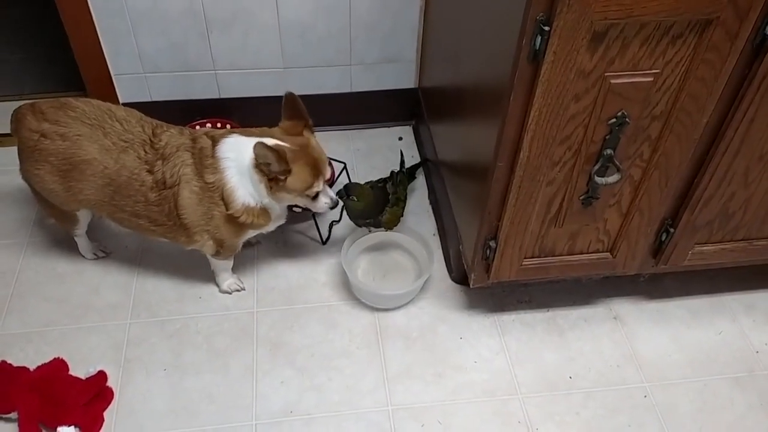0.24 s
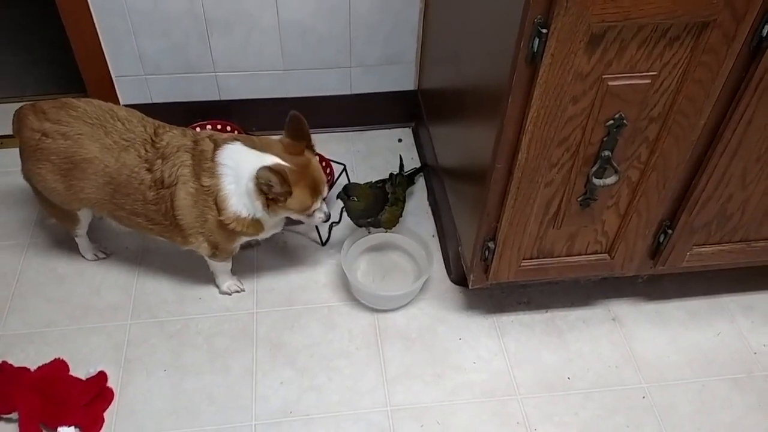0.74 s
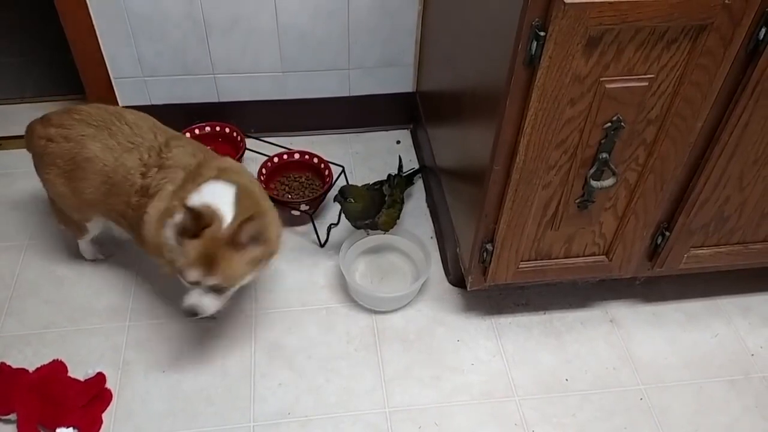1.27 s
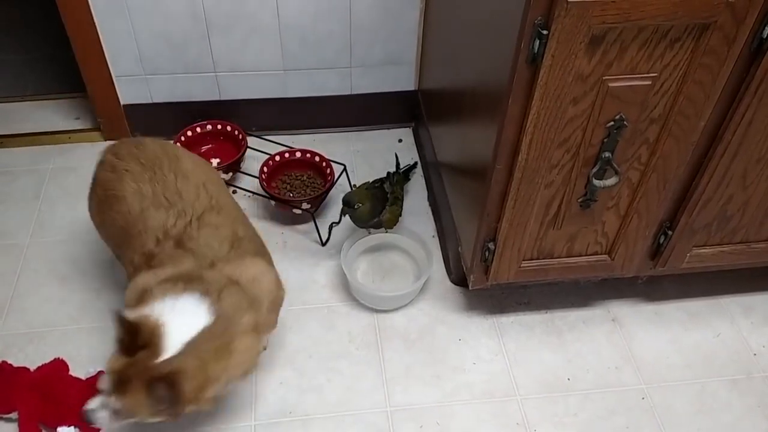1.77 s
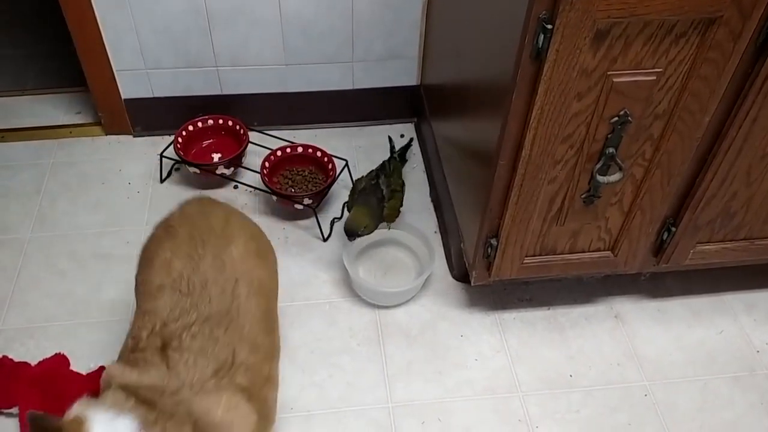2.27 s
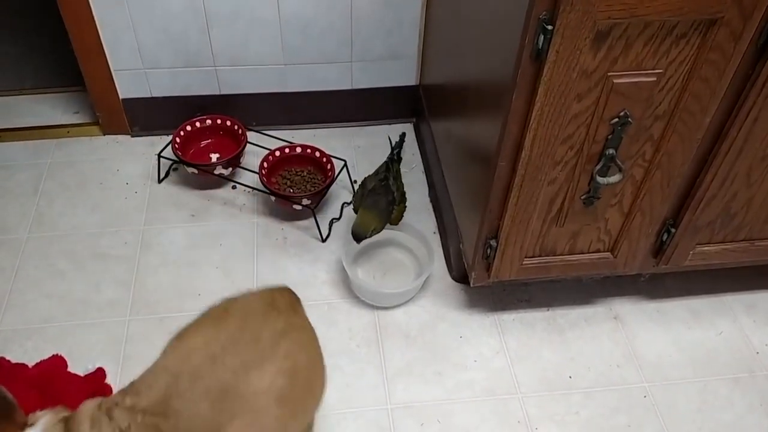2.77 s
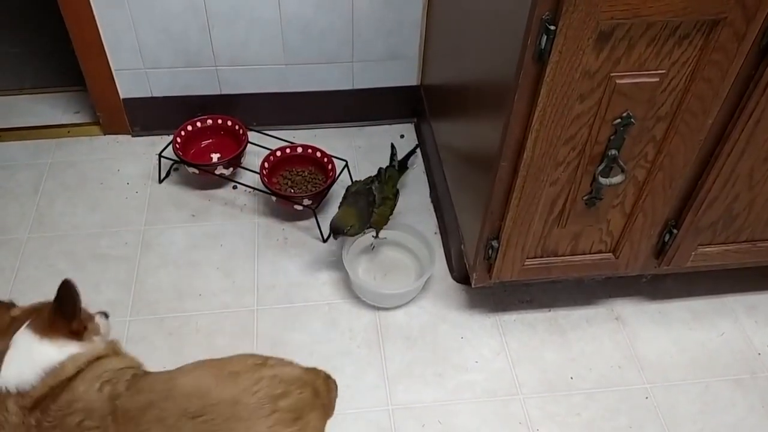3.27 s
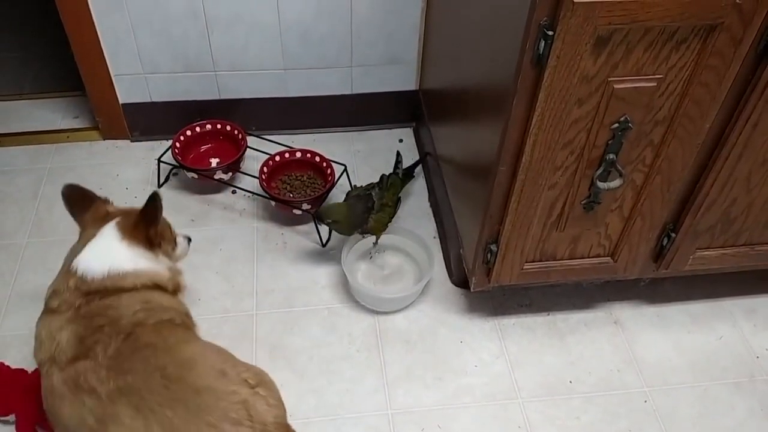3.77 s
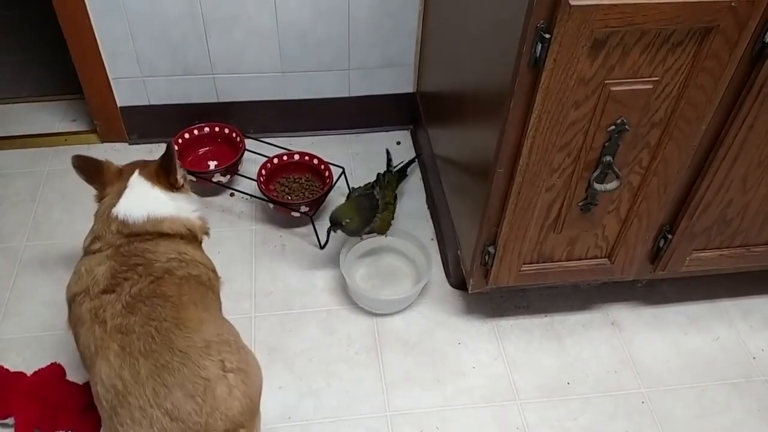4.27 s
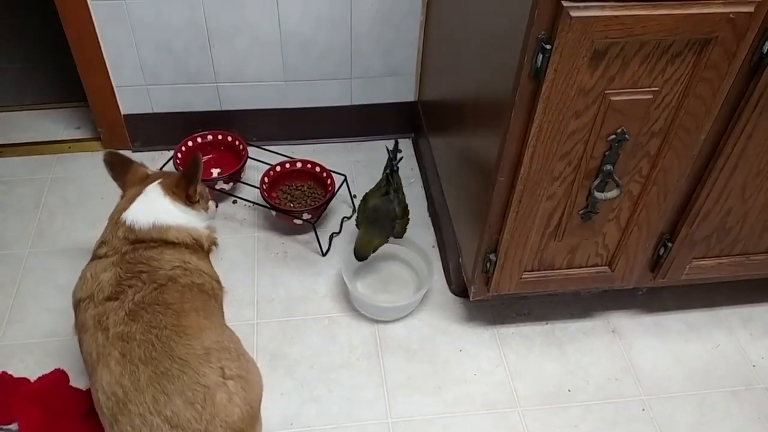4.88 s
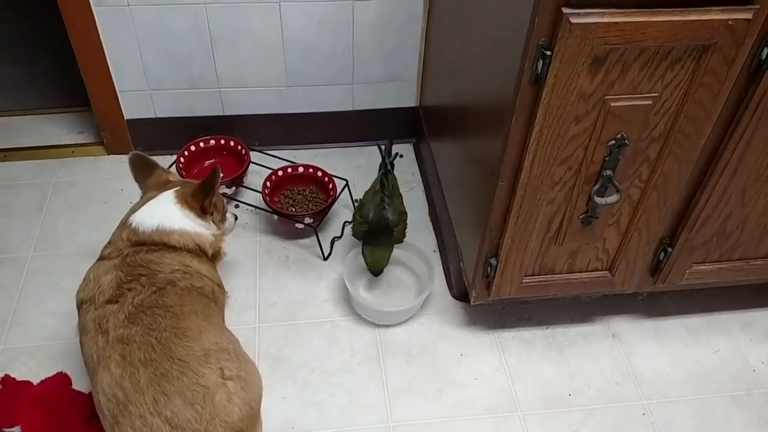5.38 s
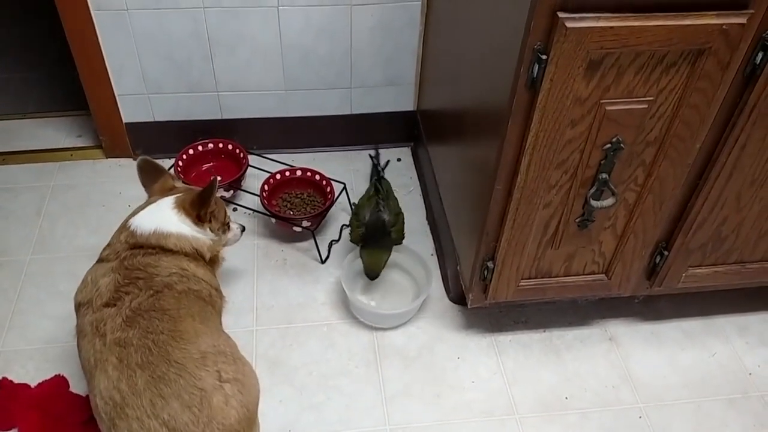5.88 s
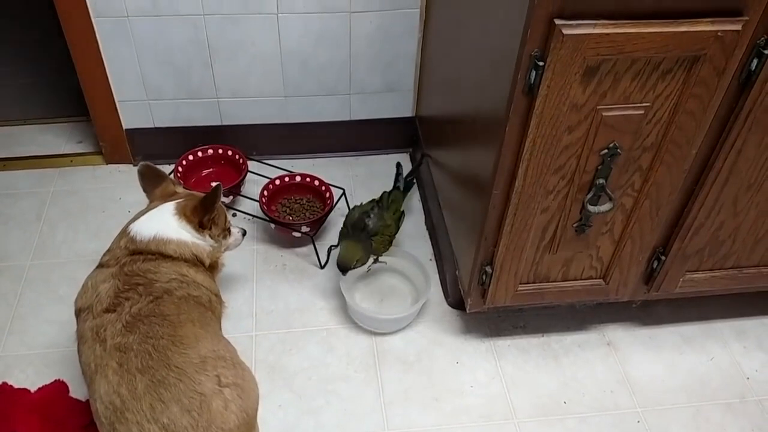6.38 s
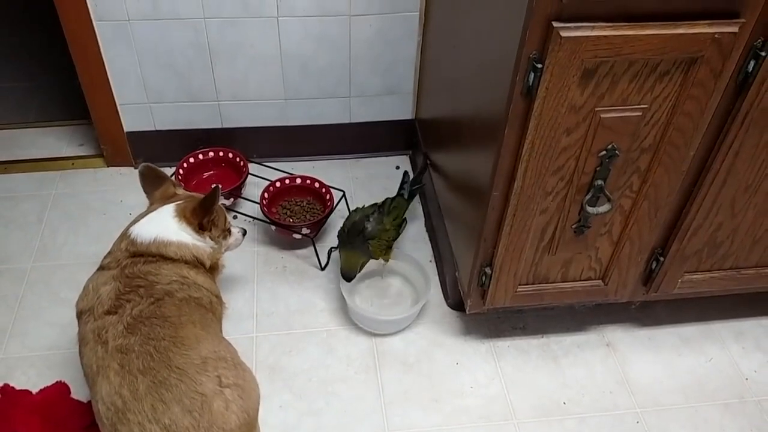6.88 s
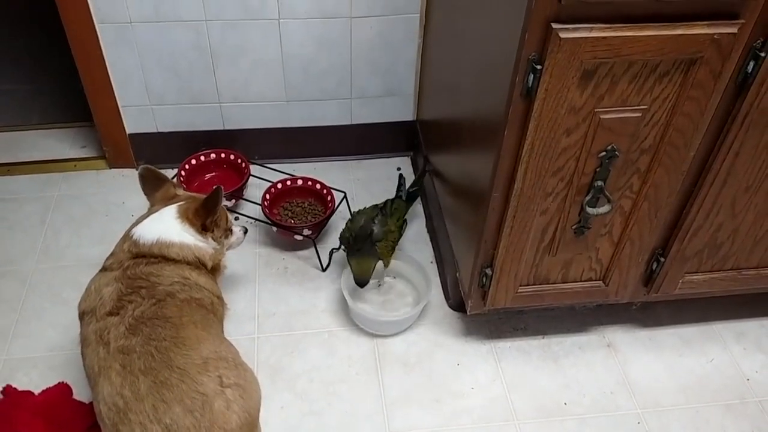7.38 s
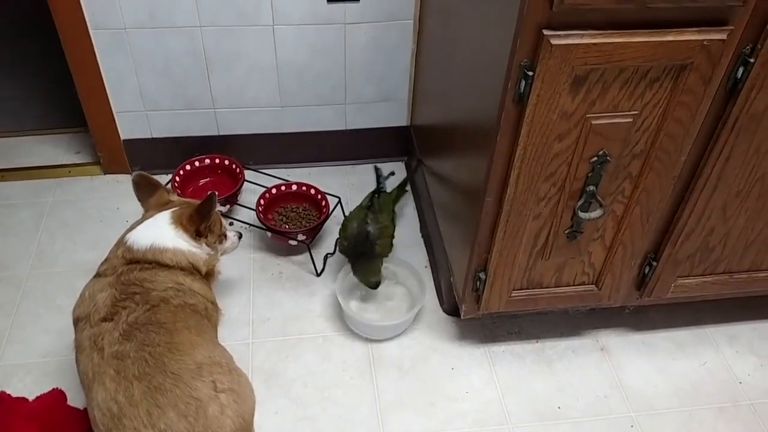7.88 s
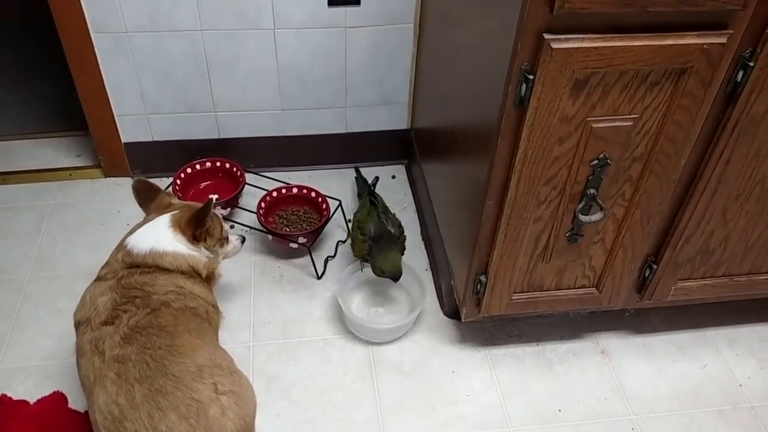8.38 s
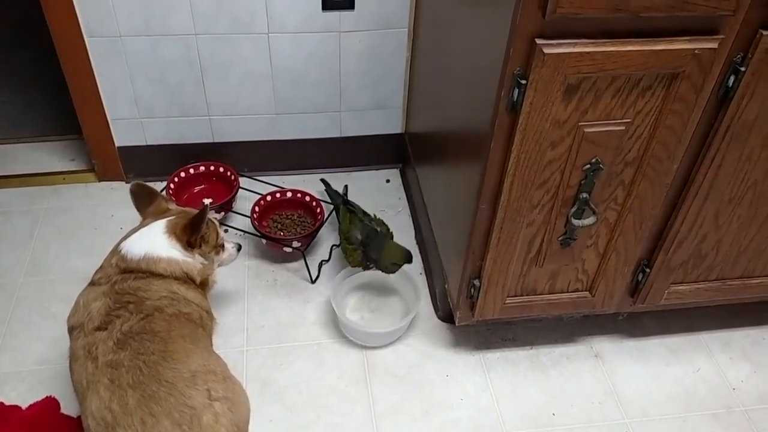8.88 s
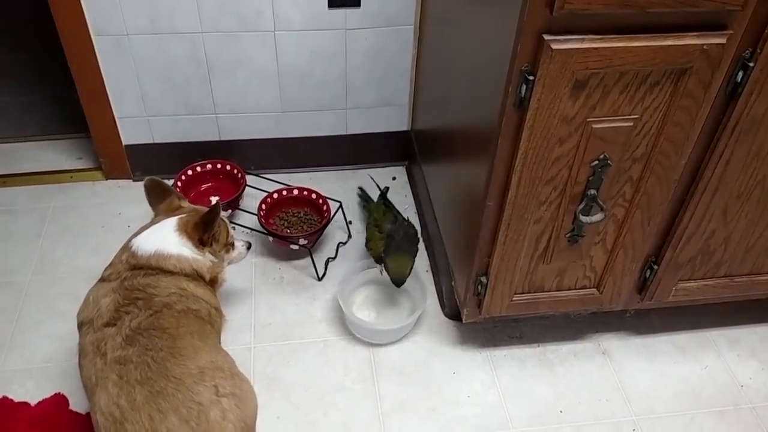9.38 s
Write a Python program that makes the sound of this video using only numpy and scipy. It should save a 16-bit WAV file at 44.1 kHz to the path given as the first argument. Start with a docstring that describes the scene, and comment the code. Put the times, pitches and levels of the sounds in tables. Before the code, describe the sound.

A small parrot gives four short harsh squawks in a quiet humming kitchen, with dog claws ticking and a plastic bowl knocked once.

```python
"""A faint appliance hum and a soft rush of air fill a hard kitchen; then a small dog's claws tick on the floor.
A metallic clink follows, and a small parrot squawks four times: each call arches up as a clear reedy note, then
breaks into a rasp, three of them trailed by a croak. A plastic bowl is knocked and pecked; one faint chirp glides up.
Calls are stacked harmonics and breath, contacts are filtered noise bursts, the clink and hum are sines.
One microphone hears bird, dog and bowl near enough that direct sound outweighs the echoes of the hard room."""
import sys
import numpy as np
from scipy import signal
from scipy.fft import rfft, irfft, next_fast_len
from scipy.io import wavfile
from scipy.ndimage import map_coordinates

SR = 44100
rng = np.random.default_rng(int(sys.argv[2]) if len(sys.argv) > 2 else 0)


def store_wav(level_fs):
    """Save 16-bit WAV to argv[1]."""
    pcm = np.round(np.clip(np.atleast_2d(level_fs), -1, 1) * 32767)
    wavfile.write(sys.argv[1], SR, pcm.T.astype(np.int16))


N = 425124  # length in samples
TOP_HZ = 15600  # the recorder's upper band limit

# decay of the kitchen's diffuse tail: [f/Hz, t60/s]
ROOM_DECAY = [(500, .32), (2000, 0.36), (4000, 0.35), (6500, 0.27), (9000, .29), (14000, 0.26)]

# hum lines of the appliance motor, before drift and trim: [f/Hz, level/dB]
MOTOR_LINES = [(48.2, -76.5), (189.5, -67.5), (239, -72.5), (295, -69.5), (333, -69), (355, -72.5),
               (474, -75.5), (523, -84.5), (588, -80), (707, -76), (855, -79)]
# spectrum of the rush of air, relative: [f/Hz, density/dB per Hz]
AIR_SPECTRUM = [(20, -16.5), (45, -12), (85, -15), (125, -6.5), (170, -6.5), (270, -7.5), (345, -7),
                (400, -11), (460, -9), (1410, -14.5), (2120, -24.5), (3000, -28.5), (3550, -28),
                (5000, -35), (9000, -41.5), (15500, -46)]
AIR_LEVEL_DB = -60  # rms

# footfalls on the floor, main claw before room and trim; a long rise is a scuff, a short one a tick:
# [t/s, peak level/dB, rise/s]
FOOTFALLS = [(1.146, -56, 0.00325), (1.654, -47.5, .006), (1.724, -50, 0.014), (1.938, -52.5, 0.0055),
             (2.018, -53.5, .005), (2.242, -49, 0.0062), (2.698, -54, 0.0078), (2.855, -51, 0.0064),
             (2.921, -43, .0005), (3.119, -52, .006), (3.277, -53.5, .001), (3.335, -41.5, .005),
             (3.354, -45.5, .003), (3.442, -39.5, 0.00084), (3.553, -50.5, .004), (3.674, -51.5, .002),
             (3.729, -43.5, .01), (3.846, -54, 0.0032)]
# colour of claw on hard floor: [f/Hz, level/dB]
CLAW_COLOUR = [(200, -16.5), (700, -6), (1800, 1.5), (3000, 2), (4200, 2.5), (7000, -4.5), (8500, -11.5),
               (15000, -20.5)]
# each dB pair below: the value for an instant contact, then its growth per step of slowness
KNOCK_DB, KNOCK_GROWS_DB = -7.5, 3  # low knock
SCUFF_DB, SCUFF_GROWS_DB = -23, 2.5  # slide after the contact
TOE_DB, TOE_GROWS_DB = -25.5, 7  # lighter claws before and after the main one
TOE_GAP_S = 0.025  # mean gap between claws

# faint metallic clink as the dog turns, before the room: [t/s, peak level/dB]
CLINK_TIMES = [(2.019, -50)]
# modes of the small piece of metal; clinks() caps the decay: [f/Hz, relative level/dB, t60/s]
METAL_MODES = [(2830, -3, 0.077), (3483, -9.5, 0.1), (3764, -0.5, 0.073)]

# parrot squawks, levels before fades, room and trim:
# [t/s, leap to the clear note after/s, break after/s, time scale of the break/s, length/s, low f/Hz, top f/Hz,
#  level at start/dB, level at break/dB, level at end/dB, treble let out by the open beak/dB,
#  roughness of held note/0-1, roughness of rasp/0-1]
SQUAWK_CALLS = [ (2.275, .015, 0.08, .004, 0.12, 628, 1287, -18, -20.5, -31, 2.5, 0.05, .33),
                (3.928, .005, .070, .002, 0.12, 756.6, 1319, -22, -19, -17.5, 1, 0.13, .27),
                (5.876, .0245, .111, .0055, 0.15, 573.8, 1162, -21.5, -18, -20, -2, .09, .52),
                (8.360, .018, 0.095, .003, .138, 737, 1320, -16.5, -22.5, -24, 5.5, 0.09, .5)]
# throat and beak colour, one list for each squawk: [f/Hz, level/dB]
THROAT_COLOURS = [
    [(300, -37.5), (480, -16), (750, -8), (1280, -5), (1550, -14), (1920, 10.5), (2550, -5.5), (3000, -0.5),
     (3850, -4), (4300, -18.5), (5100, -13.5), (6500, -18.5), (7600, -34.5), (9000, -37), (11000, -48)],
    [(300, -42.5), (520, -29.5), (760, -14), (1300, -6.5), (1550, -4.5), (2260, 3), (2650, -2), (3150, -6),
     (3900, -1.5), (4400, -13), (5300, -11.5), (6700, -20), (9000, -34.5), (11000, -44.5)],
    [(300, -39), (520, -21.5), (780, 0), (950, -7.5), (1170, 2), (1650, 0.5), (2050, 3.5), (2330, 1),
     (2750, -9.5), (3450, 1), (4000, -6), (4650, -7), (6100, -24.5), (8200, -28.5), (11000, -45)],
    [(300, -34.5), (540, -31), (760, -5), (950, -8), (1280, 6.5), (1600, -3), (2220, 4), (3050, -7),
     (3850, -2.5), (4350, -15.5), (5200, -7), (5900, -24.5), (6600, -23.5), (7500, -30), (9000, -33),
     (11000, -50.5)],
]
# last croaks that trail a squawk, before swell, room and trim:
# [t/s, length/s, first f/Hz, f it sinks towards/Hz, level/dB, treble/dB, roughness/0-1]
LAST_CROAKS = [ (2.401, .041, 1007, 460, -26, -4.5, .35), (4.038, 0.069, 1003, 724, -19, -9, .4),
               (8.497, 0.059, 1253, 705.4, -22, -4.5, .45)]
# soft upward chirp, before swell, room and trim: [t/s, level/dB]
CHIRP_TIMES = [(7.838, -64)]

ATTACK_S = 0.011  # time constant of the voice swelling in
LEAP_S = .0037  # time scale of the syrinx tightening
ARCH_DEPTH, ARCH_TOP = .24, .68  # curvature as a share of pitch; place of the peak along the held note
SETTLE_SHARE, SETTLE_S = .1, .01  # extra sharpness as the rasp begins, and how fast it sinks away
WAVER, WAVER_RATE = .004, 110  # pitch unsteadiness as a share; random knots per second
ONSET_ROUGH, CRACK_ROUGH = .15, .13  # roughness added before the leap, and as the note breaks
SHUT_DB = -8  # treble change while the beak is half shut before the leap
CLOSING_DB_PER_S = -51  # treble slope after the break as the beak closes
SLACK_TREBLE_DB = -5  # treble change of a slack syrinx
CROAK_SAG_S, CROAK_ARCH = .015, 0.46  # time constant of the sinking pitch; exponent of the swell
CHIRP_S, CHIRP_FROM_HZ, CHIRP_TO_HZ = .026, 1700, 2700

# the bowl rocking on the floor, before the room: [t/s, peak level/dB]
BOWL_KNOCKS = [(4.231, -25.5), (4.249, -28.5), (4.275, -25.5)]
# resonances of the plastic bowl: [f/Hz, width/Hz, relative level/dB]
BOWL_MODES = [(1348, 1000, 2.5), (2191, 860, 6.5), (3045, 900, 4.5), (4530, 920, 7), (4926, 700, -3),
              (8978, 1500, -18)]

# beak pecks about the bowl, before the room: [t/s, peak level/dB]
BEAK_PECKS = [(6.368, -55), (7.4447, -63.5), (8.0157, -55), (8.232, -53), (8.9507, -54), (9.1233, -56),
              (9.3994, -58)]
# colour of beak on rim: [f/Hz, level/dB]
PECK_COLOUR = [(500, -14), (2000, -10.5), (4000, 12), (6500, -3), (9000, -12), (15000, -19.5)]


def amp(db):
    """Decibels to gain."""
    return 10 ** (np.asarray(db) / 20)


def unit(x):
    """Scale to rms 1."""
    return x / np.sqrt(np.mean(x ** 2) + 1e-20)


def along(points, hz):
    """Read (Hz, value) points on a log frequency axis."""
    f, v = np.transpose(points)
    return np.interp(np.log(hz + 1), np.log(f), v)


def wobble(rate, size):
    """A smooth random curve with rate knots a second."""
    knots = rng.standard_normal(int(size * rate / SR) + 4)
    return map_coordinates(knots, [np.arange(size) * rate / SR])


def filtered(x, response):
    """x shaped by a response of frequency."""
    m = next_fast_len(len(x) + 4096)
    spectrum = rfft(x, m) * response(np.fft.rfftfreq(m, 1 / SR))
    return irfft(spectrum, m)[:len(x)]


def add(track, s, sound):
    """Mix a sound into the track at time s."""
    part = track[round(s * SR):][:len(sound)]
    part += sound[:len(part)]


def in_kitchen(x, walls_db, tail_db):
    """Direct sound, early echoes from floor and cabinets, and a diffuse tail, drawn anew for each sound."""
    hz, t, z = signal.stft(rng.standard_normal(SR // 2), SR, nperseg=256)
    decay = amp(-60 * t / along(ROOM_DECAY, hz)[:, None])
    tail = signal.istft(z * decay, SR, nperseg=256)[1]
    tail *= 1 - np.exp(-np.arange(len(tail)) / SR / .008)  # the tail builds up
    room = amp(tail_db) * tail / np.linalg.norm(tail)
    delays = rng.uniform(.002, .022, size=8)
    room[(delays * SR).astype(int)] += amp(walls_db) / np.sqrt(len(delays))
    room[0] += 1
    return signal.fftconvolve(x, room)


def appliance(hum_trim_db=-1, drift_hz=0.89, waver_db=2):
    """A motor's hum lines, wandering in pitch and level, over a soft rush of air."""
    air = unit(filtered(rng.standard_normal(N), lambda hz: amp(along(AIR_SPECTRUM, hz))))
    hum = np.zeros(N)
    for hz, db in MOTOR_LINES:
        phase = 2 * np.pi * np.cumsum(hz + drift_hz * wobble(3, N)) / SR
        hum += np.sqrt(2) * amp(db + waver_db * wobble(3.3, N)) * np.sin(phase)
    return amp(AIR_LEVEL_DB) * air + amp(hum_trim_db) * hum


def tap(response, rise, t60, scuff_db, scuff_t60):
    """A short contact burst and a grainy scuff as it slides, coloured by what is struck; peak 1."""
    t = np.arange(SR // 10) / SR
    # cubed noise is sparse and grainy
    scuff = amp(scuff_db - 60 * t / scuff_t60) * rng.standard_normal(len(t)) ** 3
    contact = rng.standard_normal(len(t)) * amp(-60 * np.maximum(t - rise, 0) / t60)
    burst = (contact + scuff) * np.minimum(t / rise, 1)
    # the filter also spreads backwards, so leave it room in front
    sound = filtered(np.pad(burst, (32, 0)), response)
    return sound / np.abs(sound).max()


def claws(dulling_db=-3, toe_scatter=.12, trim_db=1.0):
    """Three claws meet the hard floor at each footfall; slower contacts are duller with a stronger low knock."""
    track = np.zeros(N)
    for s, db, rise in FOOTFALLS:
        slowness = np.log2(1 + rise / .002)
        knock_db = KNOCK_DB + KNOCK_GROWS_DB * slowness
        top_db = dulling_db * slowness
        scuff_db = SCUFF_DB + SCUFF_GROWS_DB * slowness
        toe_db = TOE_DB + TOE_GROWS_DB * slowness

        def colour(hz):
            """Floor colour with a low knock below about 2.5 kHz and a dulled top."""
            low = knock_db / (1 + (hz / 2500) ** 4)
            return amp(along(CLAW_COLOUR, hz) + low + top_db * (hz / 10000) ** 2)

        for toe in (-1, 0, 1):
            tick = tap(colour, rise, t60=0.022, scuff_db=scuff_db, scuff_t60=0.11)
            tick = amp(db + toe_db * abs(toe)) * tick
            lag = toe * TOE_GAP_S * (1 + toe_scatter * rng.standard_normal())
            add(track, s + lag, in_kitchen(tick, walls_db=-3.5, tail_db=-5.5))
    return amp(trim_db) * track


def clinks(longest_t60=.06):
    """A small piece of metal rings briefly as a few decaying sine modes."""
    t = np.arange(SR // 5) / SR
    ring = np.zeros(len(t))
    for hz, db, t60 in METAL_MODES:
        ring += amp(db - 60 * t / min(t60, longest_t60)) * np.sin(2 * np.pi * hz * t)
    ring /= np.abs(ring).max()
    track = np.zeros(N)
    for s, db in CLINK_TIMES:
        add(track, s, amp(db) * in_kitchen(ring, walls_db=-6, tail_db=-6))
    return track


def syrinx(pitch, rough, throat, jitter=.045, wander=0.046, split=0.49, uneven_db=3.0,
           rasp_db=-9, breath_db=-26, hiss_db=4):
    """A stack of harmonics in the throat; as the voice breaks, its cycles turn uneven and noisy."""
    size = len(pitch)
    unsteady = jitter * wobble(900, size) + wander * wobble(130, size)
    phase = 2 * np.pi * np.cumsum(pitch * (1 + rough * unsteady)) / SR
    # half multiples appear when strong and weak cycles alternate
    k = np.arange(2, 50)[:, None] / 2
    hz = k * pitch
    alternation = np.where(k % 1, split * rough * wobble(90, size), 1)
    strength = alternation * amp(along(throat, hz)) * (hz < TOP_HZ)
    strength *= amp(uneven_db * np.array([wobble(70, size) for _ in k]))
    partials = strength * np.sin(k * phase + rng.uniform(0, 2 * np.pi, k.shape))
    tone = partials.sum(axis=0) / np.sqrt(np.sum(strength ** 2, axis=0) / 2)
    # air escapes in a puff once a cycle, a little brighter than the note
    puffs = rng.standard_normal(size) * (1 + np.cos(phase))
    rasp = unit(filtered(puffs, lambda f: amp(along(throat, f) + hiss_db * np.minimum(f / 6000, 1))))
    return tone + (amp(breath_db) + amp(rasp_db) * rough) * rasp


def squawk(pitch, db, rough, beak_db, throat, flutter_db=6, throb_db=6, throb_hz=142, throb_drift=.2):
    """The syrinx, fluttering and throbbing where it is rough, let out through the beak."""
    t = np.arange(len(pitch)) / SR
    # the broken voice comes in quick, uneven bursts
    throb_rate = throb_hz * (1 + throb_drift * wobble(80, len(t)))
    throb = np.sin(2 * np.pi * np.cumsum(throb_rate) / SR)
    flutter = np.tanh(wobble(500, len(t)))
    bursts = amp(rough * (flutter_db * flutter + throb_db * throb))
    voice = unit(syrinx(pitch, rough, throat) * bursts)
    # the closing beak shuts in the treble above about 2.8 kHz
    treble = filtered(voice, lambda f: 1 / (1 + (2800 / (f + 1)) ** 12))
    voice = voice + (amp(beak_db) - 1) * treble
    edges = np.clip(np.minimum(t, t[-1] - t) / 0.0065, 0, 1)
    return voice * amp(db) * edges


def call(leap_s, break_s, letting_go_s, length, low_hz, top_hz, start_db, break_db, end_db,
         open_db, clear, rasp, throat):
    """The syrinx tightens into a high, clear, bright note, then cracks and lets go into a low, dull rasp."""
    t = np.arange(0, length, 1 / SR)
    before_leap = 1 / (1 + np.exp((t - leap_s) / LEAP_S))
    broken = 1 / (1 + np.exp((break_s - t) / letting_go_s))
    tension = (1 - before_leap) * (1 - broken)
    # the pitch arches while held and settles once slack
    progress = np.clip((t - leap_s) / (break_s - leap_s), 0, 1)
    note_hz = top_hz * (1 - ARCH_DEPTH * (progress - ARCH_TOP) ** 2)
    slack_hz = low_hz * (1 + SETTLE_SHARE * broken * np.exp(-np.abs(t - break_s) / SETTLE_S))
    pitch = slack_hz + (note_hz - slack_hz) * tension
    pitch = pitch * (1 + WAVER * wobble(WAVER_RATE, len(t)))
    rough = clear + (rasp - clear) * broken
    rough = rough + ONSET_ROUGH * before_leap + CRACK_ROUGH * np.sin(np.pi * broken)
    db = np.interp(t, [0, break_s, length], [start_db, break_db, end_db])
    gape_db = SHUT_DB * before_leap + CLOSING_DB_PER_S * np.maximum(t - break_s, 0)
    beak_db = open_db + gape_db + SLACK_TREBLE_DB * (1 - tension)
    return squawk(pitch, db, rough, beak_db, throat) * (1 - np.exp(-t / ATTACK_S))


def croak(length, first_hz, last_hz, db, beak_db, rough, throat):
    """One more push of air through the slack syrinx: it swells and fades as its pitch sinks."""
    t = np.arange(0, length, 1 / SR)
    pitch = last_hz + (first_hz - last_hz) * np.exp(-t / CROAK_SAG_S)
    swell = np.abs(np.sin(np.pi * t / length)) ** CROAK_ARCH
    return squawk(pitch, db, rough, beak_db, throat) * swell


def chirp(db):
    """A small pure upward glide that swells and fades."""
    progress = np.arange(0, CHIRP_S, 1 / SR) / CHIRP_S
    pitch = CHIRP_FROM_HZ + (CHIRP_TO_HZ - CHIRP_FROM_HZ) * progress
    return amp(db) * np.sin(np.pi * progress) * np.sin(2 * np.pi * np.cumsum(pitch) / SR)


def parrot(trim_db=-1.5):
    """Squawks, croaks and a chirp ring in the room; a croak keeps the throat of the squawk that it trails."""
    starts = [row[0] for row in SQUAWK_CALLS]
    sounds = [(s, call(*shape, throat)) for (s, *shape), throat in zip(SQUAWK_CALLS, THROAT_COLOURS)]
    for s, *shape in LAST_CROAKS:
        throat = THROAT_COLOURS[np.searchsorted(starts, s) - 1]
        sounds.append((s, croak(*shape, throat)))
    sounds += [(s, chirp(db)) for s, db in CHIRP_TIMES]
    track = np.zeros(N)
    for s, sound in sounds:
        add(track, s, in_kitchen(sound, walls_db=-7, tail_db=-5.0))
    return amp(trim_db) * track


def plastic(f):
    """Broad, quickly damped resonances of alternating sign, rolled off above 11.5 kHz."""
    total = 0
    for k, (hz, width, db) in enumerate(BOWL_MODES):
        damping = 1j * f * width
        total = total + (-1) ** k * amp(db) * damping / (hz * hz - f * f + damping)
    return total / (1 + (f / 11500) ** 8)


def bowl():
    """Each rocking contact on the floor rings the resonances of the plastic bowl."""
    track = np.zeros(N)
    for s, db in BOWL_KNOCKS:
        knock = tap(plastic, rise=0.00042, t60=0.0048, scuff_db=-30.5, scuff_t60=.12)
        add(track, s, amp(db) * in_kitchen(knock, walls_db=-4.0, tail_db=-6.5))
    return track


def pecks():
    """The beak taps lightly on the bowl's rim: short noise bursts with a bright colour."""
    track = np.zeros(N)
    for s, db in BEAK_PECKS:
        tick = tap(lambda hz: amp(along(PECK_COLOUR, hz)), rise=.0005, t60=0.011,
                   scuff_db=-31.5, scuff_t60=.06)
        add(track, s, amp(db) * in_kitchen(tick, walls_db=-3.0, tail_db=-10.5))
    return track


def scene():
    """Hum, dog, bird and bowl at one microphone."""
    return (appliance() + claws() + clinks() + parrot() + bowl() + pecks())[None]


def record(dry):
    """The recorder keeps nothing above its band limit."""
    return filtered(dry[0], lambda hz: hz < TOP_HZ)[None]


dry = scene()
out = record(dry)
store_wav(out)
```